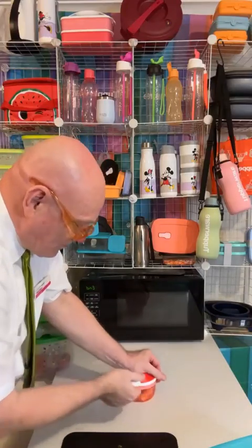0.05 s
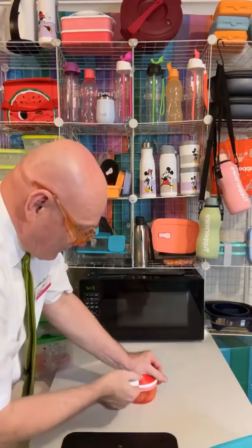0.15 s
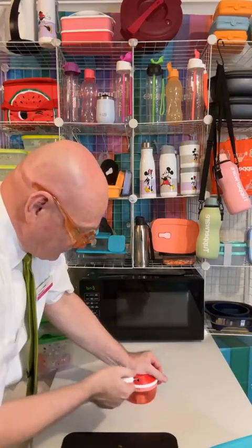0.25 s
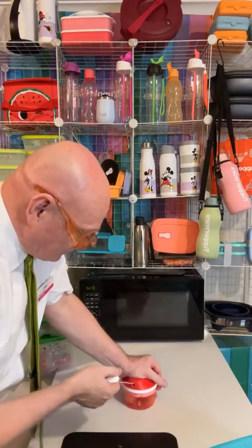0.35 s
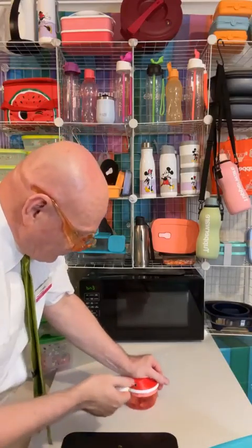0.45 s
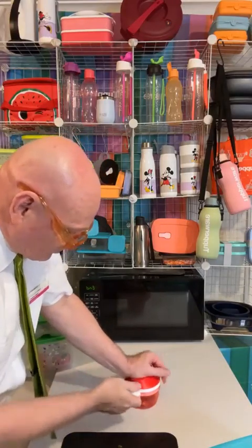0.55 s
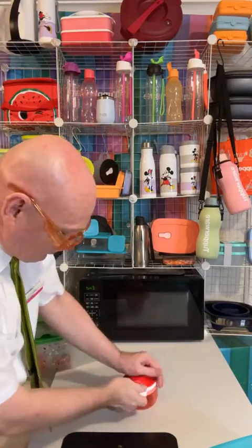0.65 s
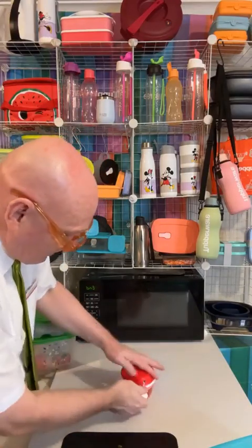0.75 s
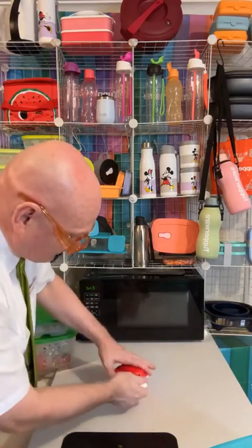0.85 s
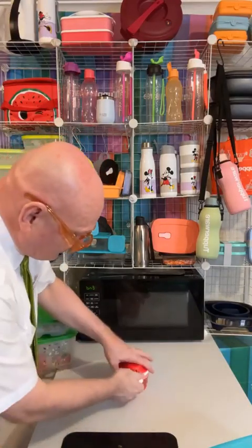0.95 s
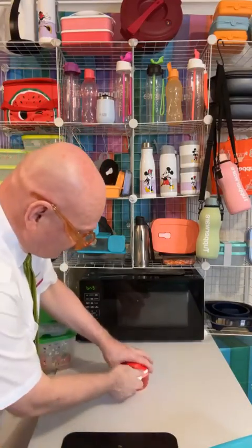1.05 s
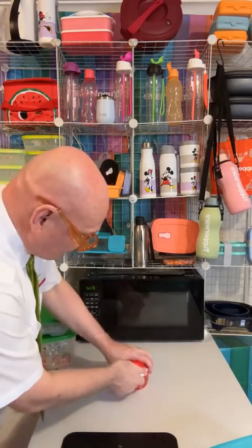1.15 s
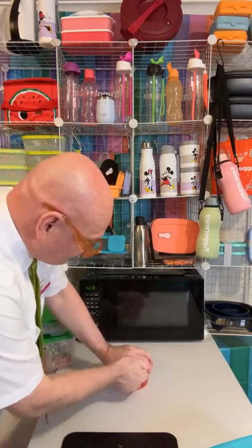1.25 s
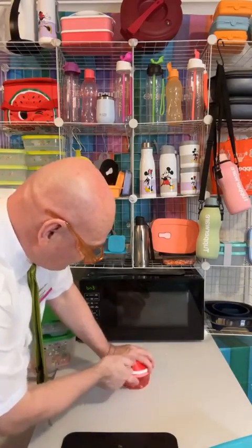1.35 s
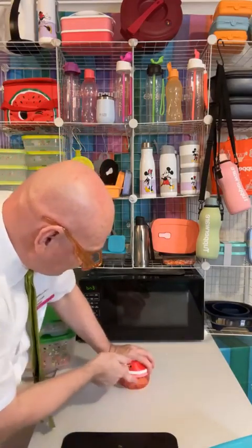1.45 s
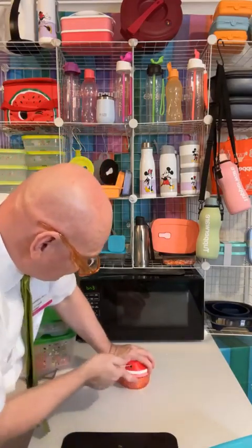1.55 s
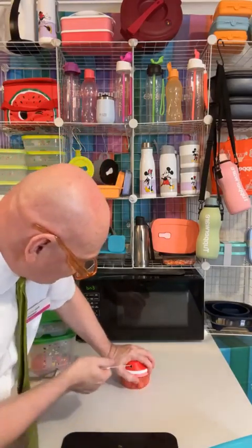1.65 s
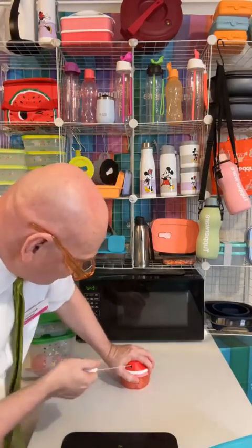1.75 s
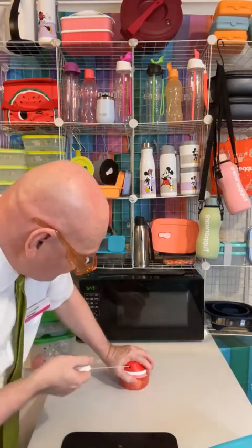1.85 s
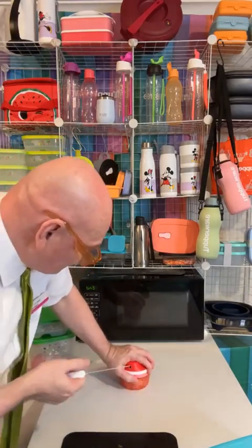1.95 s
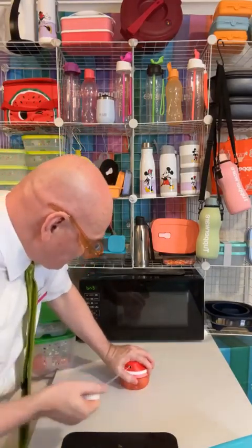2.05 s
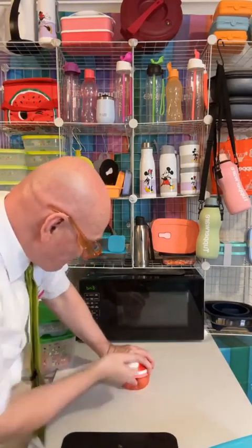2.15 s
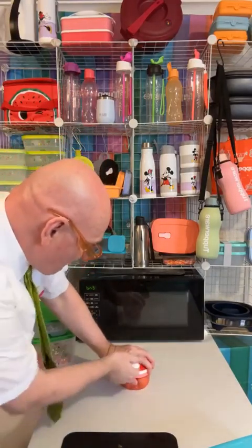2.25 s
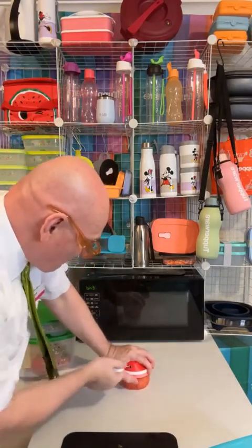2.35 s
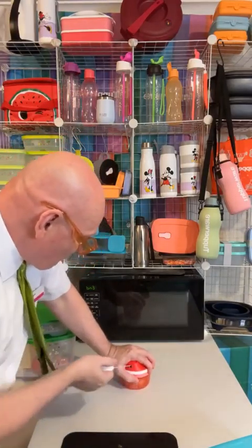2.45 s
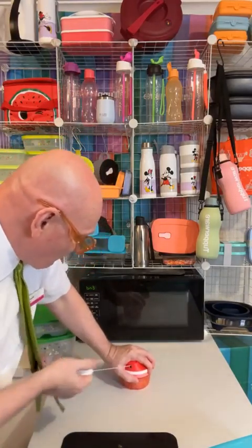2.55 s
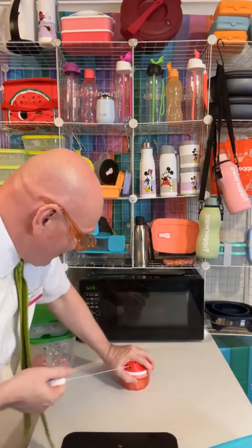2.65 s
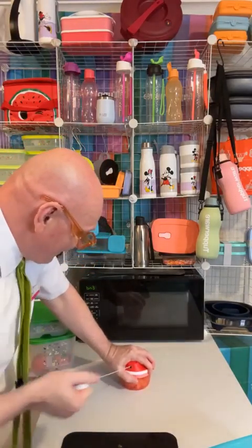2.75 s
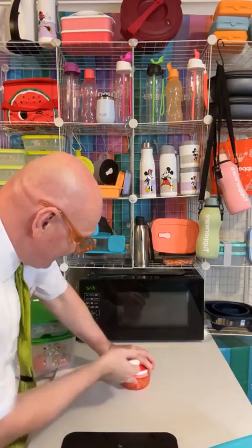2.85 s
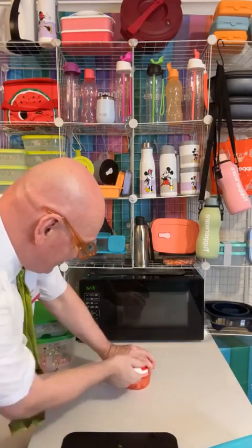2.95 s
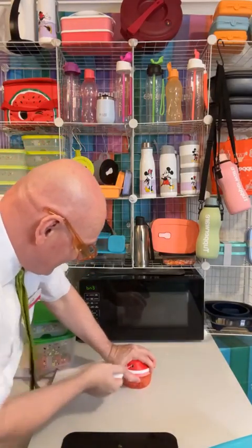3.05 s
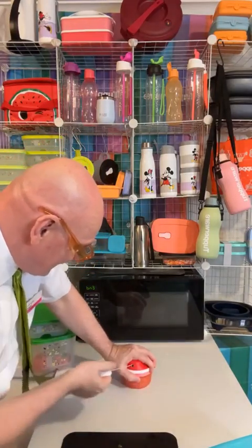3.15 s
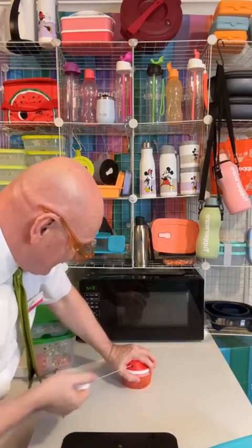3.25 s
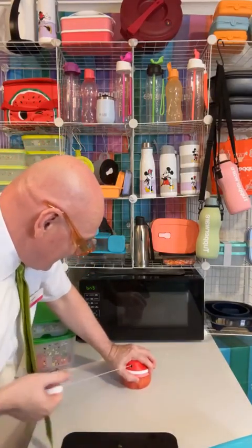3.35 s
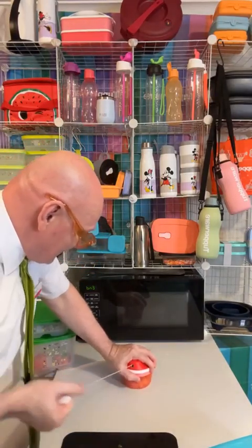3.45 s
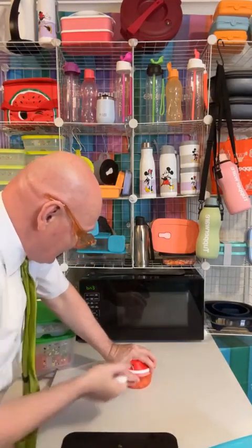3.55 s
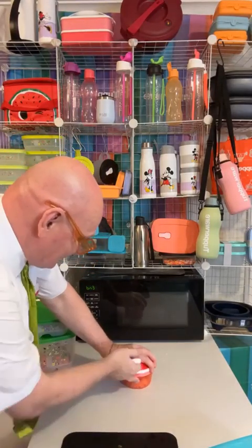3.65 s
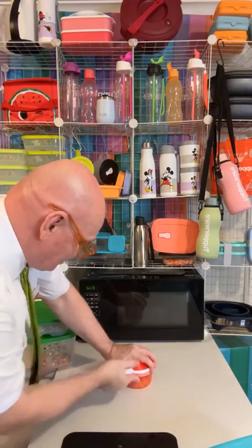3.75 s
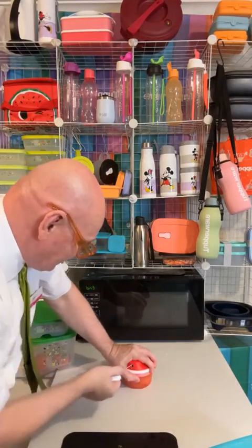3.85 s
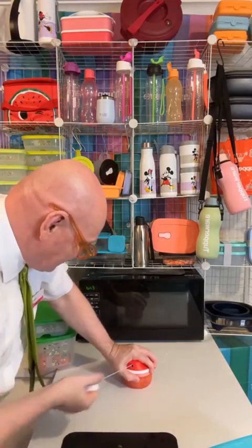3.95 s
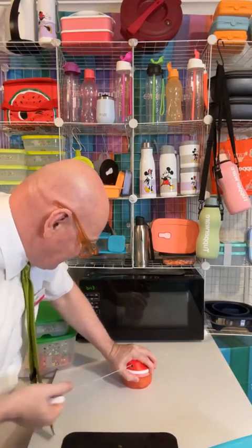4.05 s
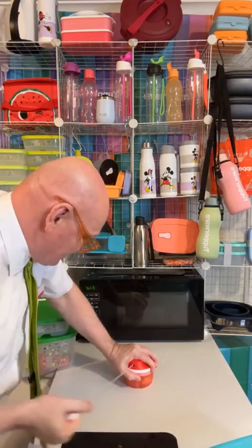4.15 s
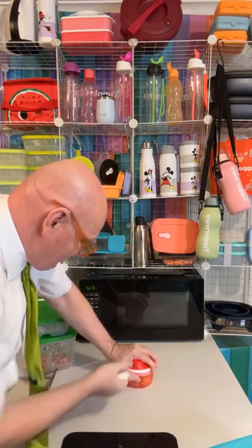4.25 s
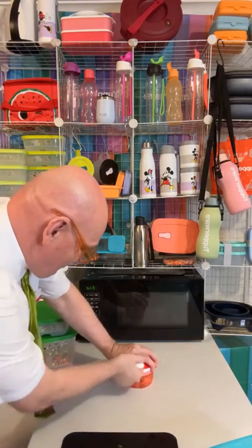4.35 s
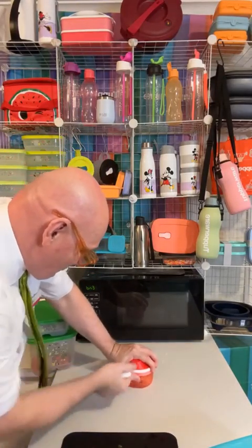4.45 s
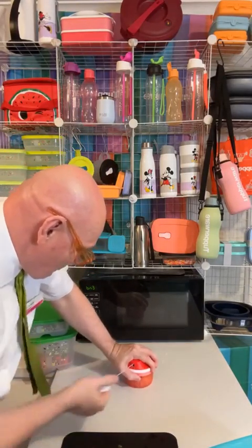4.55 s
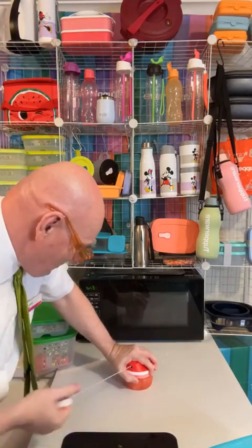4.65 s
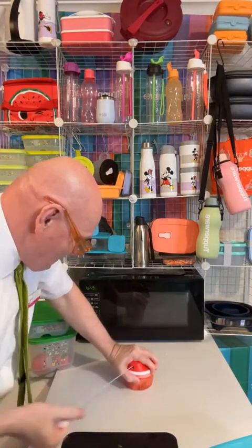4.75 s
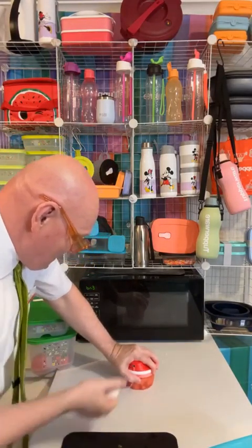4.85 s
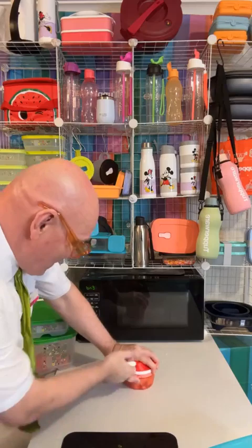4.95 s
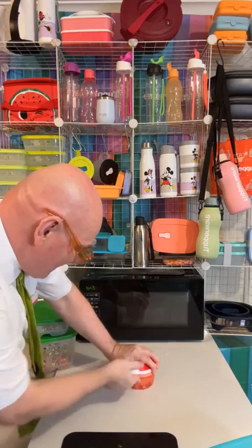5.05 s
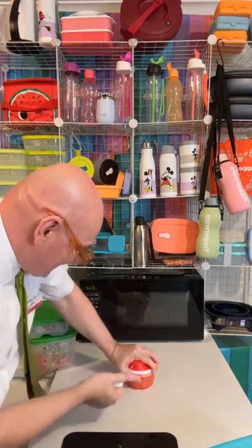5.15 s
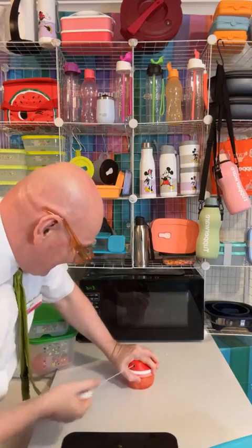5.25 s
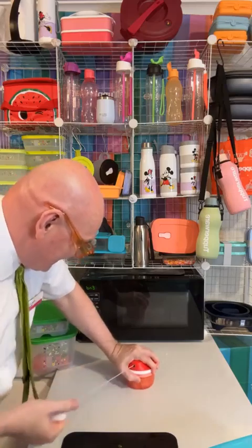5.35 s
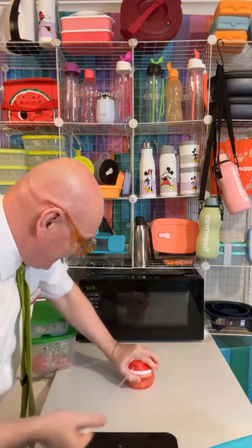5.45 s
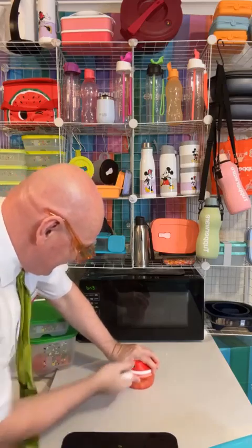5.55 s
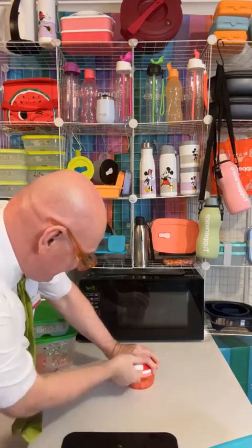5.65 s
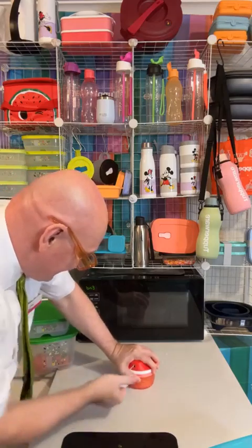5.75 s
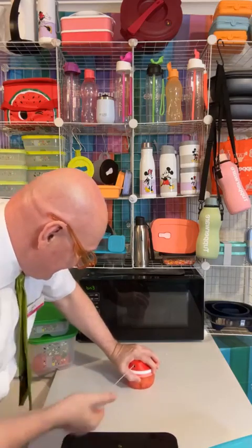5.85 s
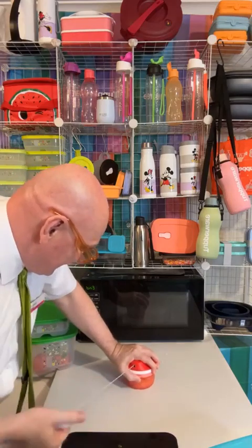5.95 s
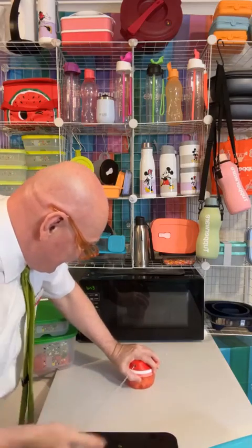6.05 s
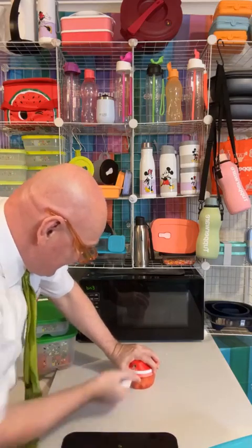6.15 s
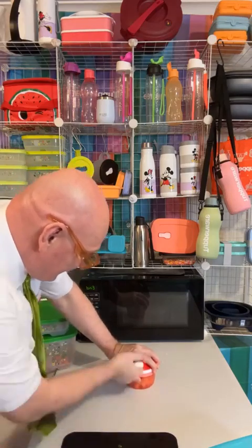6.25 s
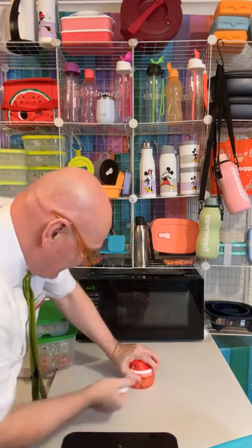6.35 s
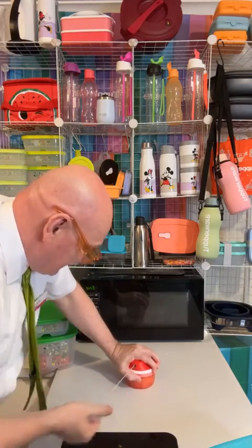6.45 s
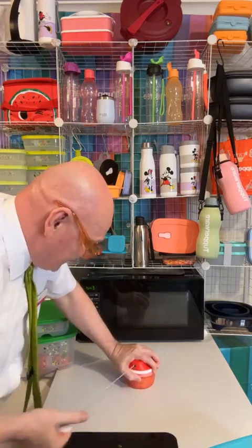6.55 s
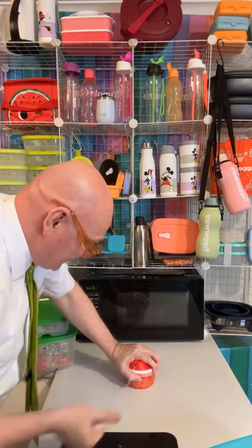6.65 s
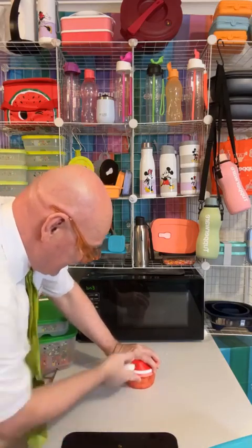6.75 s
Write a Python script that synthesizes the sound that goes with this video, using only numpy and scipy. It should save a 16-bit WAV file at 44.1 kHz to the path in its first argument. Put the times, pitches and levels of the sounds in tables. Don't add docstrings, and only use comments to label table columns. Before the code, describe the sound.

After soft scrapes and bumps, a hand-pulled chopper crunches and clatters in rhythmic bursts, with raspy spring rewinds and small handle clicks between.

```python
import sys
import numpy as np
from scipy import signal
from scipy.fft import rfft, irfft
from scipy.io import wavfile
from scipy.ndimage import uniform_filter1d

SR = 44100
rng = np.random.default_rng(int(sys.argv[2]) if len(sys.argv) > 2 else 0)


def master(y):
    cut = np.clip(np.atleast_2d(y).T, -1, 1)
    pcm = np.round(cut * 32767)
    wavfile.write(sys.argv[1], SR, pcm.astype(np.int16))


def elevation(decibels):
    levels = np.asarray(decibels, float)
    return 10 ** (levels / 20)


N = 299306

# [f/Hz, width/Hz, level/dB]
BOWL_MODES = [(285, 17.6, -16), (347, 18, -0.5), (570, 23, 1), (850, 30.5, 3), (1070, 540, -17),
              (1570, 44, -10), (2056, 57, -2.5), (4120, 710, -14)]
# [f/Hz, level/dB per Hz]
RATTLE_COLOUR = [(150, -28), (250, -6.5), (443, -10), (980, -1.5), (1310, -7), (1570, -4), (3580, -18),
                 (4480, -20), (7000, -26.5), (9100, -43.5), (15400, -120)]


def pulls():
    # [start/s, full speed/s, let go/s, rattle/dB, blade hiss/dB re rattle]
    tugs = [(1.79, 1.847, 1.914, -34.5, -19), (1.937, 1.984, 2.01, -32.5, -6.5),
            (2.116, 2.233, 2.23, -33.5, -25), (2.644, 2.706, 2.67, -26, -15.5),
            (2.754, 2.815, 2.79, -25.5, -18), (2.8, 2.898, 2.927, -24.5, -14.5),
            (3.323, 3.365, 3.4, -28.5, -15), (3.458, 3.515, 3.59, -24.5, -12),
            (4.04, 4.135, 4.21, -31.5, -16), (4.235, 4.258, 4.311, -25, -16),
            (4.73, 4.818, 4.98, -26.5, -12.5), (5.38, 5.448, 5.63, -26.5, -16.5),
            (6.009, 6.095, 6.22, -25, -15.5), (6.613, 6.679, 6.92, -25, -15.5)]
    # [f/Hz, level/dB per Hz]
    hiss_colour = [(3500, 0), (5500, 6.5), (7000, -4.5), (9500, -5.5), (12500, -5), (16000, -7)]
    start, full, let_go, rattle_db, hiss_db = np.transpose(tugs)
    spin = dict(rise_db=12, fall_db_per_s=163)
    rattle = swells(start, full, let_go, rattle_db, **spin).sum(0)
    hiss = swells(start, full, let_go, rattle_db + hiss_db, **spin).sum(0)
    crumbs = grains(4000, spread_db=2.4, clump_db=1.5, clumps_per_s=35)
    edges = grains(9000, spread_db=2.5, clump_db=3.0, clumps_per_s=14)
    chop = body(crumbs, RATTLE_COLOUR, BOWL_MODES, modes_db=-1.5) + elevation(-1.0) * piece_rings(cycles=4.7)
    return rattle * elevation(-4.0) * chop + hiss * colour(edges, hiss_colour)


def piece_rings(cycles):
    hits = grains(900, spread_db=2.0, clump_db=1.5, clumps_per_s=45)
    pitches_hz = np.geomspace(330, 3600, 14)
    dealt = rng.integers(0, 14, N)
    rings = 0
    for k, hz in enumerate(pitches_hz):
        own_hits = hits * (dealt == k) + 1e-18
        rings = rings + resonate(own_hits, [(hz, hz / cycles, 0)]) / np.sqrt(hz)
    return rms_one(colour(rings, RATTLE_COLOUR))


def rewinds():
    # [start/s, fastest/s, ratchet/dB, growth from the start/dB]
    releases = [
        (2.377, 2.473, -28.5, 1.5),
        (3.078, 3.157, -25, 7),
        (3.79, 3.892, -24.5, 17.5),
        (4.476, 4.582, -24.5, 14.5),
        (5.115, 5.205, -24.5, 9.5),
        (5.753, 5.846, -24, 10.5),
        (6.352, 6.464, -24.5, 15.5),
    ]
    # [f/Hz, width/Hz, level/dB]
    lid_modes = [(1080, 140, -2), (1576, 82, -1.5), (2145, 81, -9.5), (2850, 320, 2), (3430, 110, 5.5),
                 (5200, 400, -9.5), (5850, 290, -16)]
    # [f/Hz, level/dB per Hz]
    ratchet_colour = [(120, -34), (200, -9.5), (377, -2.5), (646, -3.5), (1490, 0), (1960, -2), (4880, -6),
                      (8000, -24), (10400, -58), (17600, -120)]
    cord_colour = [(4120, -20), (7000, -0.5), (9560, -6.5), (10800, -0.5), (15600, -3)]
    top_speed_s = 0.03
    start, full, ratchet_db, growth_db = np.transpose(releases)
    rasp = swells(start, full - top_speed_s / 2, full + top_speed_s / 2, ratchet_db - 1.0,
                  rise_db=growth_db, fall_db_per_s=204).sum(0)
    teeth = grains(9000, spread_db=1.8, clump_db=1.2, clumps_per_s=90)
    cord_hiss = elevation(-8.0) * (rasp / elevation(-26.0)) ** 0.39 * colour(teeth, cord_colour)
    return rasp * (elevation(0.5) * body(teeth, ratchet_colour, lid_modes, modes_db=-5.0) + cord_hiss)


def knocks():
    # [f/Hz, level/dB per Hz]
    crack_colour = [(1500, -26), (3000, 4), (5000, 3.5), (8000, -11.5), (15500, -17), (20000, -18)]
    knock_t60_s, ring_t60_s, crack_t60_s, thud_t60_s = 0.071, 0.024, 0.055, 0.14
    into_bowl, ring, crack, thud = np.zeros((4, N + SR))
    t = np.arange(SR // 8) / SR
    rows = knock_rows()
    noises = rng.standard_normal((len(rows), len(t)))
    for (s, peak_db, hz, thud_db, crack_db, rise_ms, bowl_db), noise in zip(rows, noises):
        rise_s = max(rise_ms, .1) / 1000
        start = max(round((s + .002 - rise_s) * SR), 0)
        at = slice(start, start + len(t))
        rise = np.minimum(t / rise_s, 1) ** 2
        after = np.maximum(t - rise_s, 0)
        partials = np.sin(2 * np.pi * hz * t)
        partials += 0.49 * np.sin(2 * np.pi * hz * (1.3 + 0.202 * noise[0]) * t)
        partials += 0.25 * np.sin(2 * np.pi * hz * (2.3 + 0.303 * noise[1]) * t)
        into_bowl[at] += elevation(peak_db + bowl_db - 9.5 - 60 * after / knock_t60_s) * rise * noise
        ring[at] += elevation(peak_db - 5.5 - 60 * after / ring_t60_s) * rise * partials
        crack[at] += elevation(peak_db + crack_db - 1.5 - 60 * after / crack_t60_s) * rise ** 3 * noise
        thud[at] += elevation(peak_db + thud_db + 14.5 - 60 * after / thud_t60_s) * rise * noise
    into_bowl, thud = into_bowl[:N] + 1e-18, thud[:N] + 1e-18
    bowl = colour(into_bowl, RATTLE_COLOUR) + elevation(-10.5) * resonate(into_bowl, BOWL_MODES)
    thud = signal.sosfilt(signal.butter(2, [140, 480], "band", fs=SR, output="sos"), thud)
    return bowl + ring[:N] + colour(crack[:N], crack_colour) + thud


def knock_rows():
    # [t/s, peak/dB, ring f/Hz, crack/dB re peak]
    chops = [(1.888, -20, 1214, -18), (1.948, -22, 1140, -25), (1.977, -4.5, 803, -12.5),
             (1.983, -6.5, 1446, -14.5), (2.233, -10, 1100, -14.5), (2.97, -16, 660, -10),
             (3.342, -15.5, 817, -30), (3.461, -14, 1000, -15), (3.517, -11.5, 1100, -26),
             (3.539, -7.5, 1070, -14.5), (3.604, -9.5, 846, -38), (4.25, -17.5, 1220, -9),
             (4.286, -7.5, 990, -18), (4.329, -11.5, 1100, -13.5), (4.352, -9, 920, -16),
             (4.417, -16, 1570, -11.5), (4.783, -15, 860, -29), (4.801, -12, 964, -38),
             (4.826, -10.5, 1570, -15), (4.881, -6.5, 1082, -18), (4.908, -13, 930, -11),
             (4.928, -19, 1110, -20), (4.974, -30, 820, -29), (4.998, -13.5, 963, -19),
             (5.514, -13.5, 970, -9), (5.551, -8.5, 910, -25), (6.072, -16, 1085, -33),
             (6.231, -11.5, 960, -12.5), (6.631, -17, 980, -23), (6.748, -10.5, 1060, -10)]
    # [t/s, peak/dB, ring f/Hz, crack/dB re peak]
    jolts = [(1.82, -26.5, 1020, -18), (1.869, -16.5, 957, -28), (2.143, -21, 746, -15),
             (2.188, -12.5, 795, -14.5), (2.243, -16, 570, -25), (2.269, -15, 830, -29),
             (2.282, -23, 560, -29), (2.678, -13, 1570, -9.5), (2.791, -20, 816, -28),
             (2.824, -7, 1210, -10), (2.905, -7, 1175, -13.5), (2.921, -13, 1105, -20),
             (3.368, -19.5, 1110, -24), (3.502, -15, 940, -26), (3.584, -9.5, 967, -14),
             (3.614, -18, 954, -25), (4.218, -17, 1057, -11.5), (4.273, -13, 1495, -20),
             (5.557, -21, 1500, -26), (4.391, -15, 985, -15), (4.762, -17, 1020, -15),
             (5.055, -22.5, 850, -12.5), (5.406, -23, 550, -27), (5.473, -6.5, 593, -12.5),
             (5.487, -9, 950, -29), (5.604, -13.5, 980, -20), (6.038, -20.5, 760, -31),
             (6.145, -14.5, 850, -18), (6.177, -31, 824, -21), (6.643, -13, 887, -8),
             (6.705, -17.5, 840, -11)]
    # [t/s, peak/dB, ring f/Hz, crack/dB re peak]
    clicks = [(1.568, -21, 1790, -4), (2.369, -22.5, 2850, -8), (2.373, -27, 2900, -9),
              (2.41, -22, 1520, -7), (4.519, -22, 2950, -4), (4.589, -17.5, 3300, -12),
              (2.397, -28, 1600, -22), (2.594, -17, 1600, -7.5), (3.078, -26, 1570, -2),
              (3.118, -14.5, 3030, -31), (3.285, -19.5, 820, -5.5), (3.82, -24, 3340, -25),
              (3.835, -21, 1550, -4), (4.028, -19, 1600, -5), (4.546, -24, 1146, -8),
              (4.692, -24, 1620, -5), (5.12, -24, 1140, -17), (5.344, -18.5, 1180, -9.5),
              (5.762, -32, 845, -3), (5.786, -25, 1470, -10), (5.961, -40, 825, 10),
              (5.976, -21.5, 825, -7.5), (6.401, -19.5, 2090, -5.5), (6.587, -19, 1620, -8)]
    # [t/s, peak/dB, ring f/Hz]
    further_knocks = [(1.797, -40, 344), (1.828, -28, 800), (1.846, -20, 550), (1.857, -25, 880),
                      (1.918, -28, 1065), (2.031, -22, 846), (2.038, -22, 1680), (2.09, -30, 678),
                      (2.105, -36, 818), (2.127, -30, 406), (2.136, -35, 417), (2.173, -35, 861),
                      (2.199, -18.5, 1430), (2.317, -31, 1076), (2.645, -34, 730), (2.658, -42, 1190),
                      (2.702, -20, 1390), (2.72, -17, 348), (2.76, -21, 1065), (2.847, -17, 450),
                      (2.864, -21, 1110), (2.872, -19, 1120), (2.891, -15, 990), (2.941, -19, 1055),
                      (2.953, -19, 1120), (3.008, -29, 936), (3.038, -34, 398), (3.314, -29, 2100),
                      (3.328, -35, 1076), (3.356, -33, 840), (3.38, -31, 1055), (3.392, -17, 564),
                      (3.399, -19, 470), (3.428, -30, 409), (3.479, -21, 890), (3.486, -24, 1010),
                      (3.509, -19, 920), (3.546, -15, 753), (3.556, -22, 940), (3.631, -20, 829),
                      (3.663, -23, 990), (3.679, -23.5, 1546), (3.691, -26.5, 413), (3.709, -27, 600),
                      (4.05, -29, 1650), (4.082, -29, 570), (4.099, -26, 1400), (4.108, -22.5, 1390),
                      (4.13, -27, 970), (4.138, -36, 1485), (4.158, -23, 510), (4.173, -23, 1000),
                      (4.243, -22, 624), (4.26, -17, 1106), (4.295, -13, 870), (4.304, -12, 930),
                      (4.376, -15.5, 1630), (4.451, -29, 1680),
                      (4.726, -31, 2110), (4.732, -33, 1119), (4.774, -24, 340), (4.815, -26, 506),
                           (4.849, -10.5, 1324), (4.936, -17, 1430), (4.991, -31, 882), (5.004, -16, 1055),
                           (5.086, -30, 1560), (5.422, -25, 829), (5.446, -16, 490), (5.507, -10.5, 540),
                           (5.571, -13, 800), (5.59, -17.5, 875), (5.63, -30, 936), (5.645, -22, 800.3),
                           (5.664, -35, 1020), (5.675, -34, 925), (5.717, -40, 580), (6.01, -27, 968),
                           (6.019, -35, 1421), (6.047, -30, 1390), (6.057, -20, 549), (6.084, -11.5, 910),
                           (6.099, -12.5, 1410), (6.13, -11, 930), (6.154, -7.5, 850), (6.194, -28, 700),
                           (6.202, -19, 1539), (6.239, -8, 977), (6.254, -13.5, 913), (6.26, -12, 880),
                           (6.273, -19, 535), (6.292, -19.5, 1520), (6.325, -35, 721), (6.665, -17, 704),
                           (6.68, -19, 925), (6.698, -25, 635), (6.72, -18, 839), (6.735, -11, 996),
                           (6.763, -13, 1065), (6.77, -12, 970)]
    # [t/s, peak/dB, ring f/Hz, thud/dB re peak, crack/dB re peak]
    bumps = [(0.01, -23.5, 1080, -20, -9), (0.021, -30, 1115, -12, -6), (0.039, -29.5, 1150, -21, -7.5),
             (0.174, -33, 500, -27, -26), (0.185, -33, 710, -23, -24), (0.224, -25, 840, -22, -32),
             (0.229, -17, 780, -17, -16), (0.248, -31, 2010, -23, -22), (0.256, -35, 790, -23, -25),
             (0.28, -47, 850, -12, -25), (0.345, -34.5, 475, -4, -30), (0.388, -38, 715, -24, -25),
             (0.678, -33, 655, -28, -14), (0.704, -37.5, 1210, -20, -14), (0.36, -38, 556, -4, -10.5),
             (0.51, -23.5, 776, -10, -31), (0.58, -32, 620, -22, -26), (0.771, -39, 1080, -27, -25),
             (0.799, -26.5, 2840, -22, -9), (0.95, -31, 560, -3, -13), (1.014, -37.5, 513, -8, -6.5),
             (1.128, -21, 573, -4, -13.5), (1.149, -15.5, 586, -12.5, -12), (1.292, -36, 980, -17, -19),
             (1.431, -34.5, 499, -12, -46), (1.74, -43, 790, 8.5, -26)]
    rows = []
    for kind, thud_db, rise_ms in [(clicks, -22, 1.8), (jolts, -16.5, 3.4), (chops, -31.5, 2.9)]:
        rows += [(s, db, hz, thud_db, crack_db, rise_ms, 0) for s, db, hz, crack_db in kind]
    rows += [(*row, 4.6, -2) for row in bumps]
    further_shared = (-25.5, -19, 2.6, -3)
    rows += [(*row, *further_shared) for row in further_knocks]
    return rows


def ticks():
    # [t/s, peak/dB]
    snaps = [
        (0.4944, -47),
        (0.8544, -45),
        (1.8447, -38),
        (3.3623, -42),
        (5.5697, -38),
        (5.961, -29),
        (6.1766, -30.5),
        (6.2342, -41),
    ]
    out = np.zeros(N + SR)
    t = np.arange(SR // 20) / SR
    for (s, peak_db), noise in zip(snaps, rng.standard_normal((len(snaps), len(t)))):
        start = round(s * SR)
        out[start:start + len(t)] += elevation(peak_db + 2.5 - 60 * t / 0.049) * noise
    return signal.sosfilt(signal.butter(3, 7500, "high", fs=SR, output="sos"), out[:N])


def handling():
    # [start/s, fullest/s, scrape/dB, hiss/dB re scrape, drag of the base/dB re scrape]
    rub_table = [
        (0.0, 0.13, -49, -2.5, -15),
        (0.152, 0.28, -46, -3, -12),
        (0.31, 0.536, -33, -5.5, -8.5),
        (0.633, 0.851, -35, -3, -21),
        (1.043, 1.194, -47.5, -1, -19),
        (0.936, 1.046, -50, -2, -5),
        (1.417, 1.52, -54.5, 0, -12),
        (1.566, 1.62, -41, -4, -31),
        (1.66, 1.744, -44.5, -6.5, -1),
    ]
    # [f/Hz, level/dB per Hz]
    scrape_colour = [(200, -5.5), (500, 6), (800, 4.5), (1500, 1.5), (3000, -5), (5000, -11.5),
                     (9000, -42.5)]
    rustle_colour = [(2000, -19.5), (3500, 12.5), (6000, 1.5), (8500, -11.5), (15500, -12), (20000, -2)]
    start, full, scrape_db, hiss_db, drag_db = np.transpose(rub_table)
    rubs = swells(start, full, full, scrape_db, rise_db=27, fall_db_per_s=177)
    scrape, hiss, drag = rubs.sum(0), elevation(hiss_db) @ rubs, elevation(drag_db) @ rubs
    friction = grains(6000, spread_db=-3.5, clump_db=2.5, clumps_per_s=25)
    base = signal.sosfilt(signal.butter(2, [180, 550], "band", fs=SR, output="sos"), friction)
    rub = scrape * body(friction, scrape_colour, BOWL_MODES, modes_db=-43.0)
    rub += hiss * colour(friction, rustle_colour) + drag * rms_one(base)
    return elevation(-2.0) * rub


def rumble():
    # [start/s, strongest/s, rumble/dB]
    shakes = [(0.2, 0.296, -52), (0.48, 0.553, -40), (1.115, 1.15, -37), (1.2, 1.292, -72),
              (1.753, 1.854, -38), (1.896, 2.033, -36), (2.136, 2.257, -42), (2.647, 2.71, -40.5),
              (2.698, 2.9, -36.5), (3.21, 3.387, -39.5), (3.41, 3.603, -31.5), (4.05, 4.31, -32),
              (4.54, 4.648, -43.5), (4.7, 4.926, -34), (5.378, 5.51, -37), (5.843, 6.173, -40.5),
              (6.25, 6.424, -52), (6.566, 6.787, -38.5)]
    # [f/Hz, width/Hz, level/dB]
    counter_modes = [(82, 14, -1), (113, 27, 0), (174, 26, -6), (285, 30, -6)]
    shaking = rng.standard_normal(N) * elevation(2.5 * drift(25))
    start, full, rumble_db = np.transpose(shakes)
    force = swells(start, full, full, rumble_db, rise_db=21, fall_db_per_s=112).sum(0) + elevation(-60)
    return force * rms_one(resonate(resonate(shaking, counter_modes), [(117.0, 147, 0)]))


def sway():
    # [start/s, strongest/s, level/dB]
    leans = [
        (1.1, 1.18, -50),
        (1.9, 2.0, -53),
        (2.1, 2.22, -52),
        (2.75, 2.92, -58),
        (3.3, 3.43, -52),
        (5.35, 5.54, -44),
    ]
    start, full, sway_db = np.transpose(leans)
    deep = signal.sosfilt(signal.butter(2, [22, 55], "band", fs=SR, output="sos"), rng.standard_normal(N))
    return swells(start, full, full, sway_db, rise_db=16.0, fall_db_per_s=90).sum(0) * rms_one(deep)


def kitchen(x):
    t60_s, wall_cut_hz = 0.28, 13400
    t = np.arange(SR // 2) / SR
    tail = rng.standard_normal(len(t)) * elevation(-60 * t / t60_s) * (t > .006)
    tail = signal.sosfilt(signal.butter(1, wall_cut_hz, fs=SR, output="sos"), tail)
    return signal.fftconvolve(x, tail / np.linalg.norm(tail))[:N]


def room_tone():
    # [f/Hz, level/dB per Hz]
    tone_colour = [(18, -49), (30, 0), (103, -4.5), (456, -3.5), (592, -8), (924, -3), (3800, -19.5),
                   (5200, -19), (8330, -39), (15600, -27)]
    return elevation(-56) * colour(rng.standard_normal(N), tone_colour)


def swells(start, full, let_go, level_db, rise_db, fall_db_per_s):
    columns = (start, full, let_go, level_db, rise_db)
    start, full, let_go, level_db, rise_db = (np.reshape(v, (-1, 1)) for v in columns)
    t = np.arange(N // 8 + 1) * 8 / SR
    to_go = np.clip((full - t) / np.maximum(full - start, .002), 0, 1)
    sets_in = np.clip((t - start) / .01, 0, 1)
    gain = sets_in * elevation(level_db - rise_db * to_go - fall_db_per_s * np.maximum(t - let_go, 0))
    return np.repeat(gain, 8, axis=1)[:, :N]


def grains(per_s, spread_db, clump_db, clumps_per_s):
    sizes = elevation(spread_db * np.minimum(rng.exponential(1, N), 5)) * rng.choice([-1, 1], N)
    born = rng.random(N) < per_s / SR
    return rms_one(sizes * born * elevation(clump_db * drift(clumps_per_s)) + 1e-9)


def body(contacts, spectrum, modes, modes_db):
    broad = rms_one(colour(contacts, spectrum))
    return rms_one(broad + elevation(modes_db) * rms_one(resonate(contacts, modes)))


def resonate(x, modes):
    out = 0
    for k, (hz, width_hz, level_db) in enumerate(modes):
        r = np.exp(-np.pi * max(width_hz, hz / 14) / SR)
        a = [1, -2 * r * np.cos(2 * np.pi * hz / SR), r * r]
        b = [(1 - r * r) / 2, 0, (r * r - 1) / 2]
        out = out + (-1) ** k * elevation(level_db) * signal.lfilter(b, a, x)
    return out


def colour(x, spectrum):
    size = 4096
    hz, level_db = np.transpose(spectrum)
    bin_hz = np.arange(size // 2 + 1) * SR / size
    log_gain = np.log(elevation(np.interp(np.log(bin_hz + 1), np.log(hz), level_db)))
    cepstrum = irfft(log_gain)
    cepstrum[1:size // 2] *= 2
    cepstrum[size // 2 + 1:] = 0
    response = irfft(np.exp(rfft(cepstrum)))
    return signal.fftconvolve(x, response / np.linalg.norm(response))[:N]


def drift(rate_hz):
    r = np.exp(-2 * np.pi * rate_hz / SR)
    return rms_one(signal.lfilter([1], [1, -2 * r, r * r], rng.standard_normal(N + SR))[SR:])


def rms_one(x):
    return x / np.sqrt(np.mean(x ** 2) + 1e-20)


def scene():
    chopper = pulls() + rewinds() + knocks() + ticks() + handling() + rumble() + sway()
    return (chopper + elevation(-10.5) * kitchen(chopper) + room_tone())[None]


def starved_bands(x):
    # [from/s, to/s, low f/Hz, high f/Hz]
    dropouts = [(0.53, 0.7, 4900, 5100), (0.95, 1.1, 5590, 5860), (1.68, 1.86, 2450, 2550),
                (2.8, 2.92, 3080, 3240), (2.8, 2.96, 5900, 6380), (3.1, 3.25, 4300, 4480),
                (3.09, 3.19, 5770, 5860), (3.6, 3.72, 3990, 4220), (3.92, 4.01, 2620, 2720),
                (4.31, 4.48, 5460, 5650), (4.27, 4.49, 6100, 6400), (4.63, 4.75, 4350, 4600),
                (4.83, 4.97, 6000, 6370), (5.85, 5.93, 6110, 6250), (6.04, 6.17, 6200, 6420)]
    ripple_db, rare = 2.2, 1.7
    hz, s, z = signal.stft(x, SR, nperseg=1024, noverlap=768)
    chance = uniform_filter1d(rng.standard_normal((len(hz) // 3 + 1, len(s))), size=17, axis=1)
    chance = rms_one(uniform_filter1d(chance, size=5, axis=1))
    chance = np.repeat(chance, 3, axis=0)[:len(hz)]
    middle = ((hz > 1900) & (hz < 6500))[:, None]
    limit = rare - .9 * (hz[:, None] / 6500) ** 4
    gain_db = middle * (ripple_db * chance - 30 * np.clip(4 * (-chance - limit), 0, 1))
    for start, end, low, high in dropouts:
        gain_db[np.ix_((hz >= low) & (hz <= high), (s >= start) & (s <= end))] = -30
    shift = round(6750 / hz[1])
    gain_db[shift:] += np.minimum(gain_db[:-shift] + 6, 0)
    return signal.istft(z * elevation(gain_db), SR, nperseg=1024, noverlap=768)[1][..., :N]


def band_limit(x):
    return signal.sosfilt(signal.butter(12, 16450, fs=SR, output="sos"), x)


def record(dry):
    x = signal.sosfilt(signal.butter(2, 65, "high", fs=SR, output="sos"), dry)
    x = starved_bands(x)
    x = signal.sosfilt(signal.ellip(12, .5, 48, 15740, fs=SR, output="sos"), x)
    return band_limit(x)


dry = scene()
out = record(dry)
master(out)
```